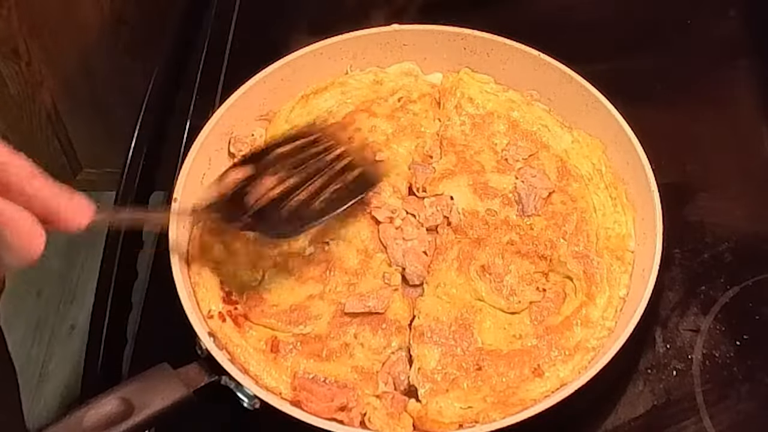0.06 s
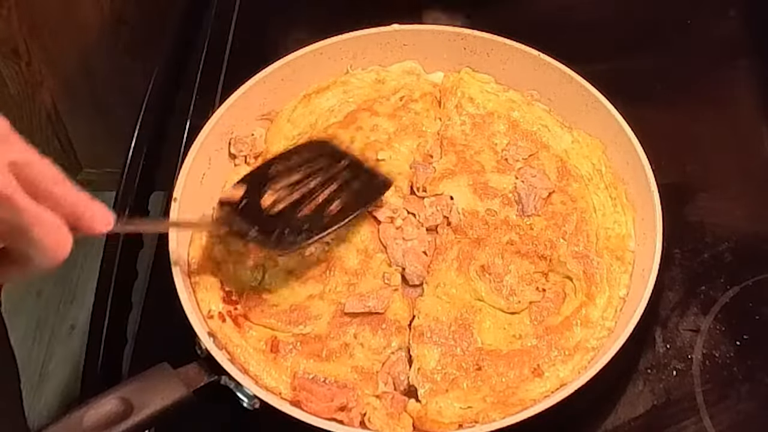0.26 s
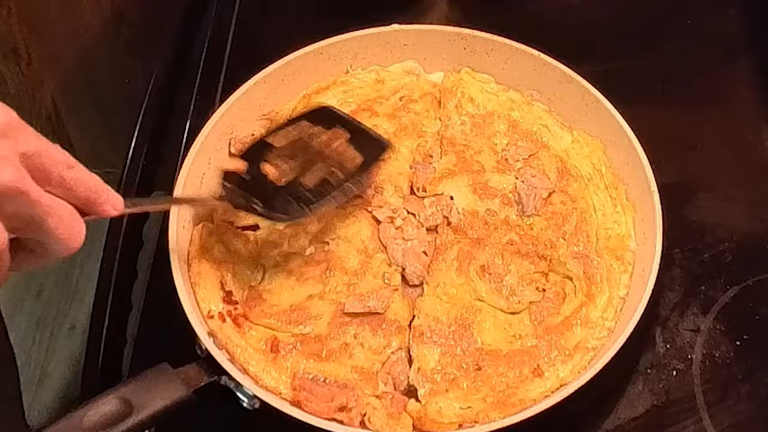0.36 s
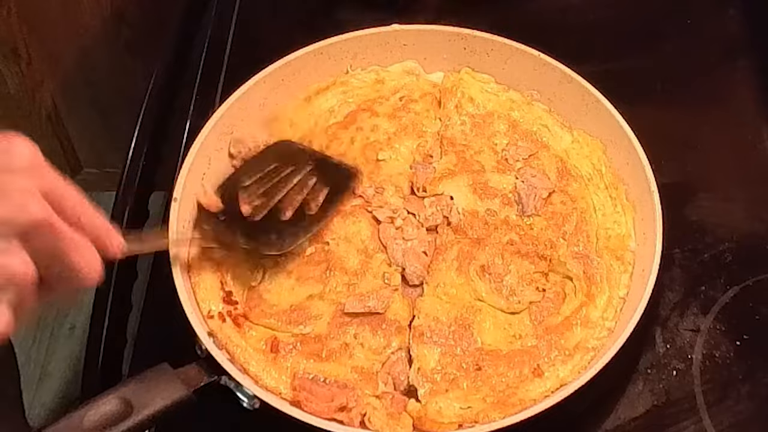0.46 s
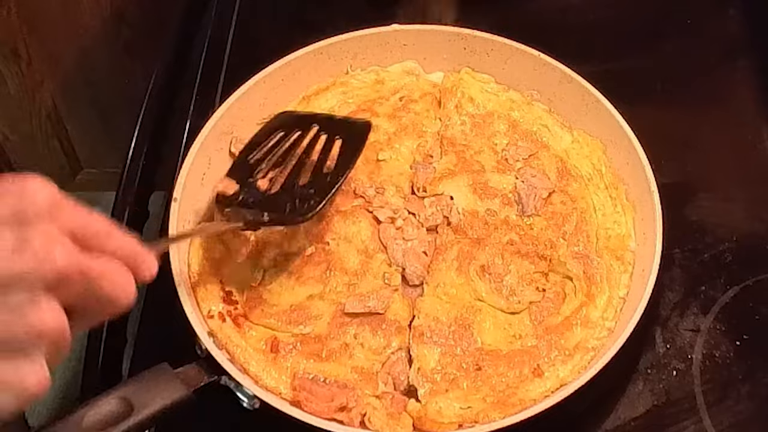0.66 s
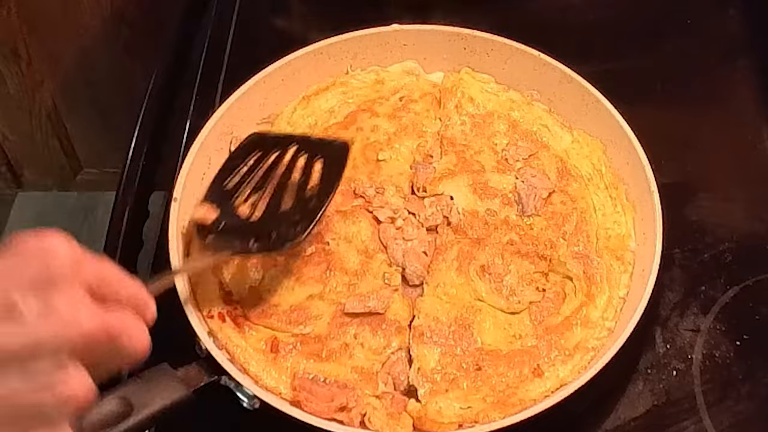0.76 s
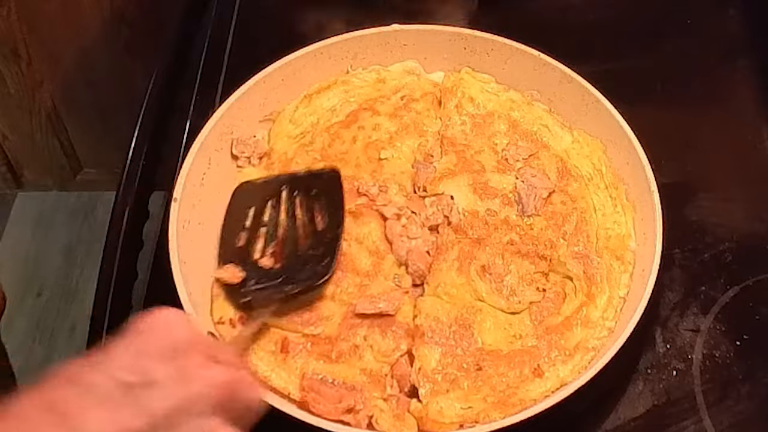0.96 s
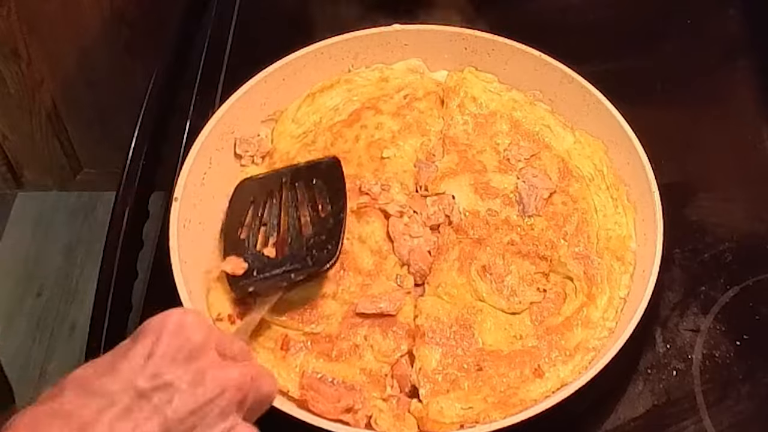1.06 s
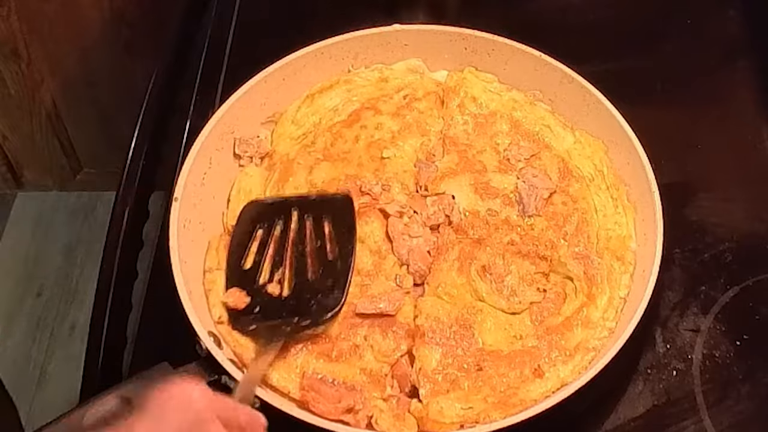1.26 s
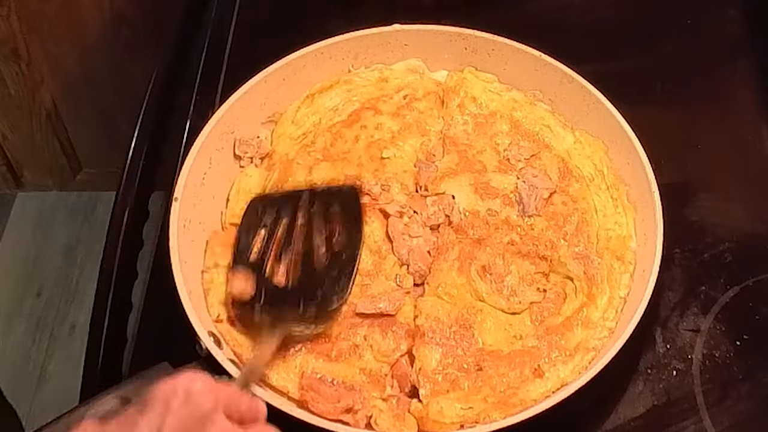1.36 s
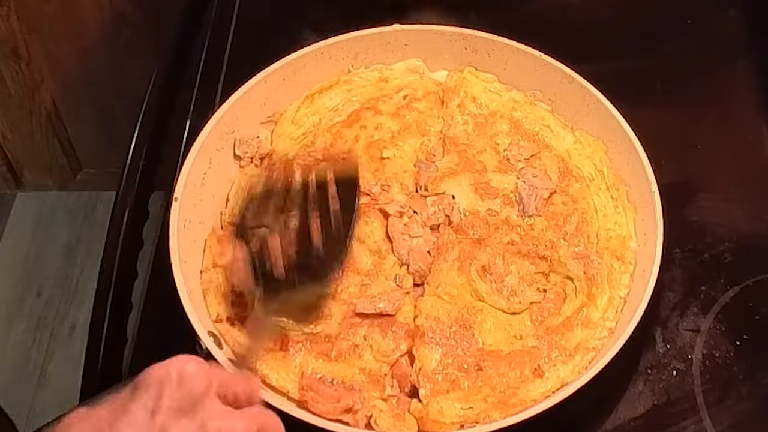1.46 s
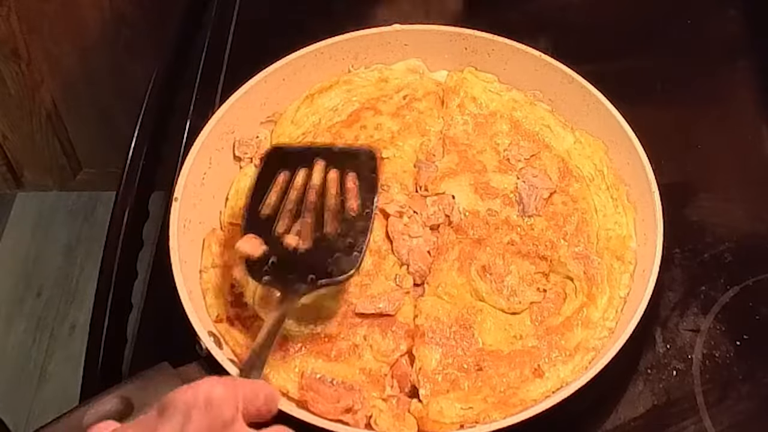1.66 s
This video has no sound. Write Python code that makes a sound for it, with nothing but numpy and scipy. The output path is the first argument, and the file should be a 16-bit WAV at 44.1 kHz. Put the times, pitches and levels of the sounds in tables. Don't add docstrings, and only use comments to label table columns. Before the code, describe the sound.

Frying food sizzles steadily, close in stereo, a little livelier around 1.0 s, with small fat pops throughout, denser after 1 s. A spatula hits the pan hard at 0.22 s, a sharp crack with ringing and rattle, more softly and woodily at 0.57, and dully at 0.96. Short scrapes come near 0.9, 1.05, 1.4 and 1.6. Faint low appliance rumble; short, hard kitchen echo.

```python
import sys
import numpy as np
from scipy import signal
from scipy.fft import rfft, irfft
from scipy.io import wavfile
from scipy.ndimage import uniform_filter1d

SR = 44100
rng = np.random.default_rng(int(sys.argv[2]) if len(sys.argv) > 2 else 0)


def store_wav(level_fs):
    pcm = np.round(np.clip(np.atleast_2d(level_fs), -1, 1) * 32767)
    wavfile.write(sys.argv[1], SR, pcm.T.astype(np.int16))


def convert_level_to_amplitude(level_db):
    exponent = np.asarray(level_db, float) / 20
    return 10 ** exponent


N = 74970


def evened(x):
    return x / np.sqrt(np.mean(x ** 2) + 1e-20)


def wander(count, width):
    return evened(uniform_filter1d(uniform_filter1d(rng.standard_normal(count), width), width))


def read(points, hz):
    f, value = np.transpose(points)
    return np.interp(np.log(hz + 1), np.log(f + 1), value, left=value[0], right=value[-1])


def add(mix, s, sound):
    part = mix[..., round(s * SR):][..., :sound.shape[-1]]
    part += sound[..., :part.shape[-1]]


def colour(x, points):
    hz = np.fft.rfftfreq(x.shape[-1], 1 / SR)
    edge = np.clip(hz / points[0][0], 0, 1) ** 3 * (hz < points[-1][0])
    return irfft(rfft(x) * convert_level_to_amplitude(read(points, hz)) * edge, x.shape[-1])


def pair(mid, side):
    # frequency in Hz, side minus middle in dB.
    side_levels = [(60, -14), (150, -16.5), (380, -14.5), (940, -10.5), (2350, -5), (5870, -4.5),
                   (14700, 2.5)]
    gain = convert_level_to_amplitude(read(side_levels, np.fft.rfftfreq(N, 1 / SR)))
    side = irfft(gain * rfft(side), N)
    return np.array([mid + side, mid - side])


def dying(x, t60s):
    hz, t, z = signal.stft(x, SR, nperseg=256)
    t60 = np.maximum(read(t60s, hz), 0.01)[:, None]
    return signal.istft(z * convert_level_to_amplitude(-60 * t / t60), SR, nperseg=256)[1]


def blip(hz, cycles):
    u = np.arange(400) / SR * hz
    swell = np.sin(np.pi * np.minimum(u / cycles, 1) ** 0.64) ** 2
    return np.sin(2 * np.pi * u) * swell


def patchy(x):
    patch_db = 2
    z = signal.stft(x, nperseg=256)[2]
    patches = uniform_filter1d(rng.standard_normal(z.shape[1:]), size=7, axis=0)
    patches = uniform_filter1d(patches, size=9, axis=1)
    return signal.istft(z * convert_level_to_amplitude(patch_db * evened(patches)), nperseg=256)[1][:, :N]


def sizzle():
    # time in seconds, level in dB.
    activity = [
        (0.0, -45),
        (0.198, -47.5),
        (0.402, -47),
        (0.876, -46.5),
        (1.026, -44.5),
        (1.7, -47.5),
    ]
    # frequency in Hz, level in dB per Hz.
    hiss_colour = [(300, -8.5), (600, -11.5), (1150, -17), (2330, -4.5), (3880, -8.5), (7000, -15.5),
                   (11300, -21), (12200, -28), (15100, -31)]
    grains_per_s, grain_spread_db = 3000, 3
    grain_db, hiss_db = -5, -1.5
    clumps = wander(N, 500)
    parts = []
    for _ in range(2):
        grains = convert_level_to_amplitude(grain_spread_db * np.minimum(rng.exponential(1, N), 5))
        grains *= rng.choice([-1., 1.], N)
        grains *= rng.random(N) < grains_per_s / SR
        steam = rng.standard_normal(N)
        frying = convert_level_to_amplitude(grain_db) * evened(grains) + convert_level_to_amplitude(hiss_db) * steam
        parts.append(evened(colour(frying, hiss_colour)))
    s, db = np.transpose(activity)
    level_db = 1.0 + np.interp(np.arange(N) / SR, s, db) + 0.52 * clumps
    return patchy(pair(*parts)) * convert_level_to_amplitude(level_db)


def rumble():
    # frequency in Hz, level in dB per Hz.
    rumble_colour = [(20, 0.5), (45, -10), (68, 2), (100, -10), (220, -11.5), (340, -10), (450, -39),
                     (1200, -21)]
    level_db = -50.5 + 0.8 * wander(N, 3000)
    noise = evened(colour(rng.standard_normal((2, N)), rumble_colour))
    return convert_level_to_amplitude(level_db) * pair(*noise)


def slides():
    # start in seconds, length in seconds, level in dB.
    strokes = [
        (0.043, 0.054, -51),
        (0.887, 0.041, -42),
        (1.045, 0.16, -53),
        (1.363, 0.1, -53),
        (1.506, 0.033, -47),
        (1.611, 0.065, -45.5),
    ]
    # frequency in Hz, level in dB per Hz.
    slip_colour = [(80, 6.5), (200, 5), (500, -6.5), (1000, 1.5), (2000, -35), (5000, -25), (9000, -37)]
    slips_per_s = 900
    level, t = np.zeros(N), np.arange(N) / SR
    for s, length, db in strokes:
        u = np.clip((t - s) / length, 0, 1)
        level += convert_level_to_amplitude(db) * np.minimum(u / 0.11, 1) * (1 - u) ** 0.5
    jerks = rng.random(N) < slips_per_s / SR
    slips = rng.standard_normal(N) * (0.24 + jerks * 8.3)
    return level * evened(colour(slips, slip_colour))


def spits():
    # start in seconds, peak in dB, pitch in Hz, spatter length in seconds.
    bursts = [(0.045, -32.5, 2450, 0.0076), (0.122, -34.5, 3200, 0.0033), (0.401, -33.5, 2250, 0.0036),
              (0.479, -29.5, 2680, 0.00119), (0.855, -34.5, 2620, 0.0058), (1.013, -23, 2910, 0.0026),
              (1.028, -30, 5460, 0.0088), (1.125, -29.5, 2900, .003), (1.166, -30.5, 4800, 0.0022),
              (1.199, -39, 3220, 0.0025), (1.26, -42, 2010, .003), (1.377, -29.5, 2880, 0.01),
              (1.396, -30.5, 2930, 0.0092), (1.423, -33.5, 3450, .003), (1.505, -32, 4850, 0.0027),
              (1.5113, -27, 2970, 0.0022), (1.558, -45, 5000, 0.0023), (1.614, -36, 3020, 0.0035),
              (1.618, -24.5, 2940, 0.0089)]
    thud_db = -9
    out = np.zeros(N)
    for s, db, hz, length in bursts:
        burst = blip(hz, 5) + 0.47 * blip(2.08 * hz, 3.4)
        thud = convert_level_to_amplitude(thud_db) * blip(0.34 * hz, 1.87)
        add(out, s, convert_level_to_amplitude(db) * (burst + thud))
        for late, pitch, size in rng.random((5, 3)):
            droplet = blip(hz * (0.6 + 1.1 * pitch), 1.8)
            add(out, s + late * length, convert_level_to_amplitude(db - 1.0 - 4.3 * size) * droplet)
    return out


def knock(k, turned=False):
    # start in seconds, crack in dB, crack pitch in Hz, rattle in dB, snap in dB.
    knocks = [
        (.2200, -6, 2460, -16, -20.5),
        (.5659, -16, 2530, -27, -37),
        (.9615, -20.5, 1900, -26.5, -44),
    ]
    pan_hz = [152, 200, 228, 285, 444, 546, 625, 778, 955, 1288, 1423, 1942, 2516, 3168]
    # t60 in seconds, then level in dB at knocks 1, 2 and 3.
    pan = [(0.23, -23.5, -31.5, -55), (0.16, -26.5, -24, -19.5), (0.44, -25, -28, -56),
           (0.48, -34.5, -37, -34), (.28, -28.5, -35, -30), (0.24, -20.5, -41, -28.5),
           (0.23, -17, -22, -25.5), (0.19, -27.5, -36, -54), (0.28, -31, -36, -34.5), (0.15, -22, -59, -63),
           (0.32, -36, -33, -37), (0.33, -19.5, -24.5, -38.5), (0.44, -27.5, -53, -38),
           (0.3, -41, -31, -31)]
    blade_hz = [1925, 2270, 2600, 3340, 3880, 4555, 5020, 5420, 6480, 7370]
    # t60 in seconds, then level in dB at knocks 1, 2 and 3.
    blade = [(0.17, -35, -39, -33), (0.059, -26, -21.5, -27), (0.25, -32, -51, -34),
             (0.071, -23.5, -37, -30), (0.033, -18, -20.5, -18.5), (0.15, -29.5, -36, -36),
             (0.057, -33, -26.5, -33), (0.033, -20.5, -26, -29), (0.036, -44, -41, -50),
             (0.066, -34, -42, -43)]
    ring_share = [1., 0.67, .65]
    # frequency in Hz, level in dB per Hz.
    rattle_colours = [
        [(53, -42), (90, -33), (150, -4), (393, -13), (617, -8.5), (929, -13.5), (1940, -13), (7490, -21.5),
         (12000, -43), (15600, -90), (22000, -120)],
        [(53, -43), (90, -10), (444, -6.5), (629, -5), (1260, -16), (1940, -18.5), (2150, -24.5), (5510, -15),
         (12000, -61), (15600, -87), (22000, -120)],
        [(53, -22), (90, -15), (580, -7), (1190, -16), (2580, -29), (2750, -19), (3170, -15.5), (3510, -21.5),
         (12000, -39), (15600, -59), (22000, -120)],
    ]
    # frequency in Hz, t60 in seconds.
    rattle_t60 = [(120, 0.31), (600, .25), (2500, 0.21), (5000, 0.11), (10000, 0.018)]
    mode_rise_s, rattle_rise_s, snap_s, side_lag_s = 0.0016, 0.0023, 0.0047, 0.00121

    s, crack_db, crack_hz, rattle_db, snap_db = knocks[k]
    t = np.arange(SR // 2) / SR
    ring = np.zeros(len(t))
    for f, row in zip(pan_hz + blade_hz, pan + blade):
        t60 = row[0] * ring_share[k]
        phase = turned * rng.random()
        first_cycle = np.minimum(t * f, 1)
        ring += first_cycle * convert_level_to_amplitude(row[1 + k] - 60 * t / t60) * np.sin(2 * np.pi * (f * t + phase))
    ring *= np.minimum(t / mode_rise_s, 1)

    noise = evened(colour(rng.standard_normal(len(t)), rattle_colours[k]))
    rattle = dying(noise, rattle_t60)[:len(t)] * np.minimum(t / rattle_rise_s, 1)
    snap = evened(np.diff(rng.standard_normal(len(t) + 1)))
    snap *= t / snap_s * np.exp(1 - t / snap_s * 2)
    hit = convert_level_to_amplitude(rattle_db) * rattle + convert_level_to_amplitude(snap_db - 7.5 * turned) * snap
    add(hit, 0, convert_level_to_amplitude(crack_db) * blip(crack_hz, 5.5))
    return s + turned * side_lag_s, np.array([hit, ring])


def kitchen(x):
    # frequency in Hz, t60 in seconds.
    room_t60 = [(150, 0.3), (600, 0.38), (2500, 0.5), (8000, 0.48)]
    gap_s = 0.005
    taps = np.zeros((2, N))
    at = np.arange(round(gap_s * SR), SR // 2, 20)
    at = at + rng.integers(0, 20, (2, len(at)))
    np.put_along_axis(taps, at, rng.choice([-1., 1.], at.shape), 1)
    tail = dying(pair(*taps)[:, :SR // 2], room_t60)
    tail = tail / np.linalg.norm(tail[0])
    return signal.fftconvolve(x[None], tail, axes=1)[:, :N]


def scene():
    ring_room_db, room_db, knock_side_db = -7.5, -3, -3
    left_db, left_lag_s = -0.2, 3e-5
    near = np.array([spits() + slides(), np.zeros(N)])
    side = np.zeros((2, N))
    for k in range(3):
        add(near, *knock(k))
        add(side, *knock(k, True))
    send = near[0] + convert_level_to_amplitude(ring_room_db) * near[1]
    near, side = near.sum(axis=0), side.sum(axis=0)
    hz = np.fft.rfftfreq(N, 1 / SR)
    left = irfft(rfft(near) * np.exp(-2j * np.pi * hz * left_lag_s), N)
    mix = np.array([left, near]) + pair(np.zeros(N), convert_level_to_amplitude(knock_side_db) * side)
    mix += convert_level_to_amplitude(room_db) * kitchen(send) + sizzle() + rumble()
    return mix * convert_level_to_amplitude(np.array([[left_db / 2], [-left_db / 2]]))


def roll_off(x):
    return signal.sosfilt(signal.butter(12, 15100, fs=SR, output="sos"), x)


def record(dry):
    return roll_off(dry)


dry = scene()
out = record(dry)
store_wav(out)
```